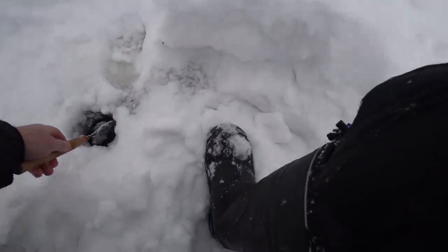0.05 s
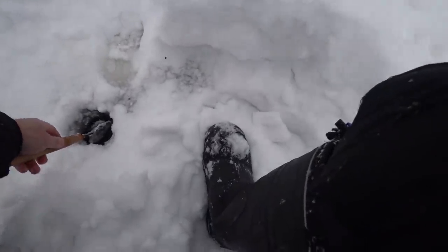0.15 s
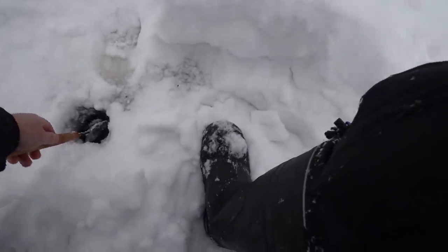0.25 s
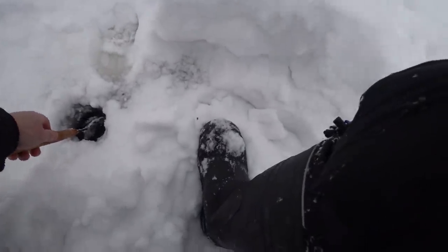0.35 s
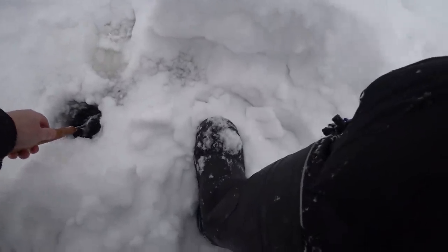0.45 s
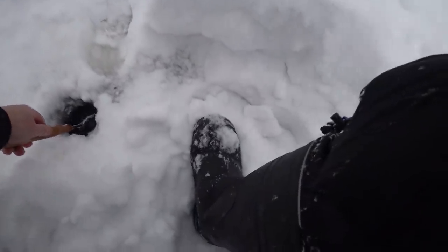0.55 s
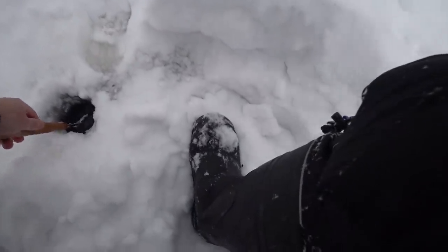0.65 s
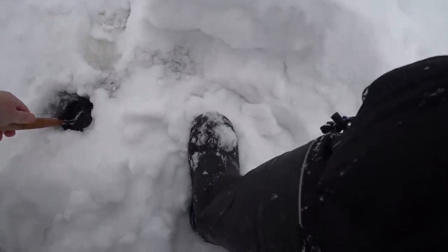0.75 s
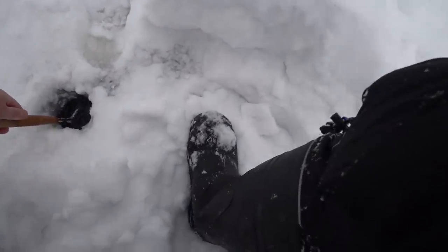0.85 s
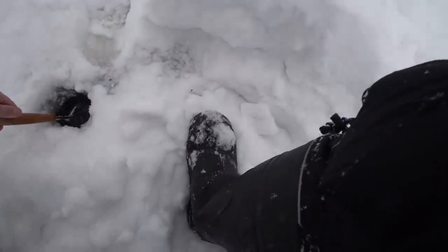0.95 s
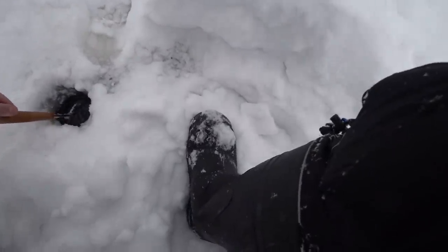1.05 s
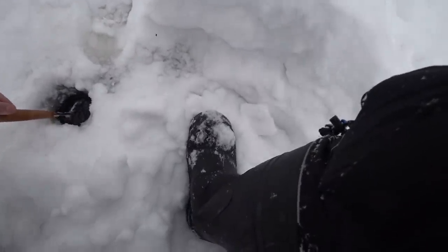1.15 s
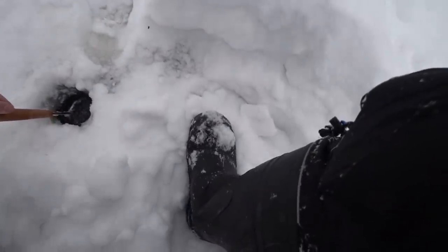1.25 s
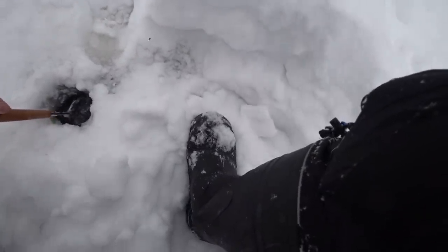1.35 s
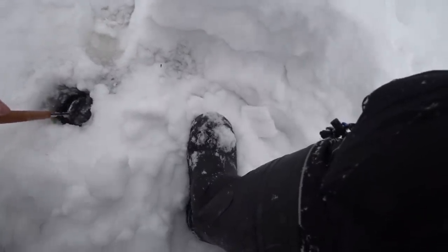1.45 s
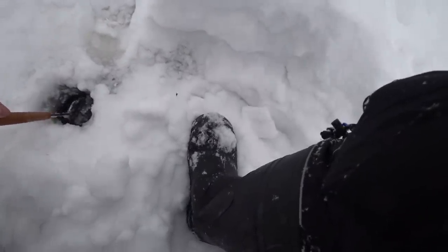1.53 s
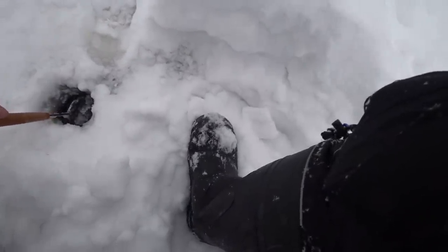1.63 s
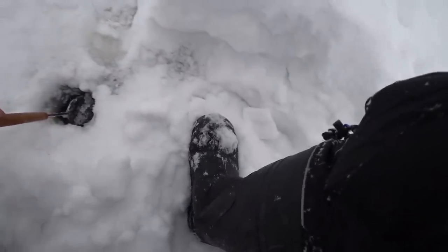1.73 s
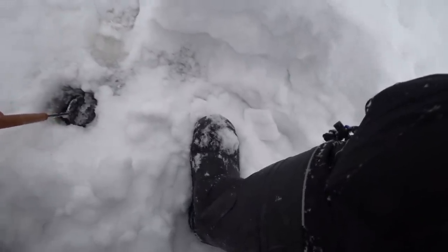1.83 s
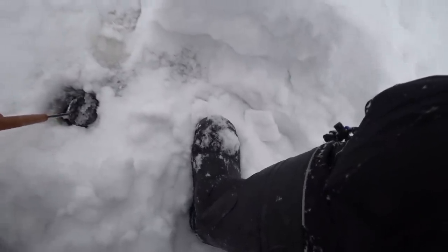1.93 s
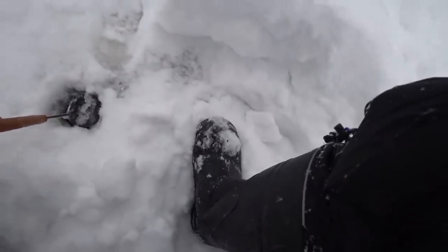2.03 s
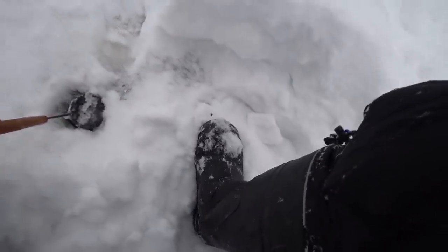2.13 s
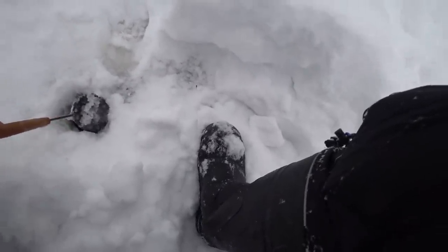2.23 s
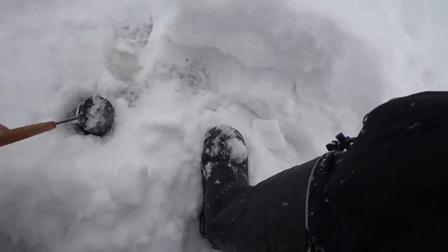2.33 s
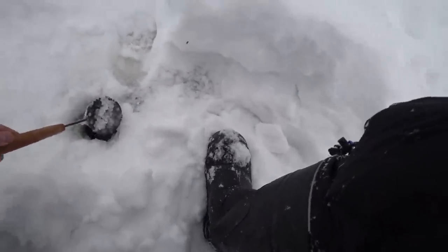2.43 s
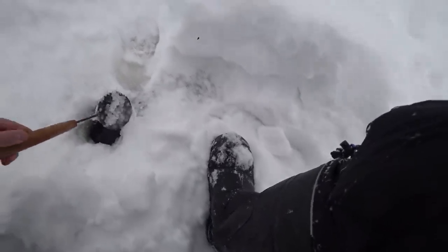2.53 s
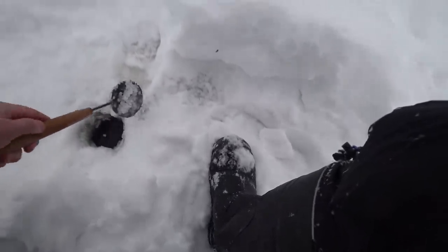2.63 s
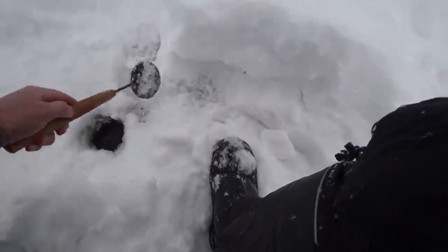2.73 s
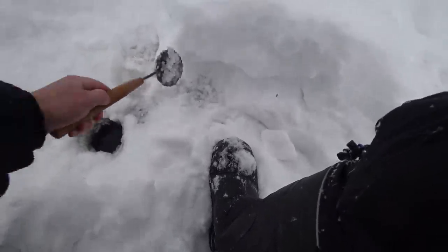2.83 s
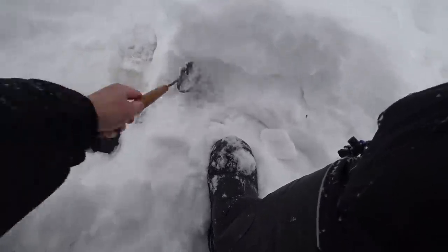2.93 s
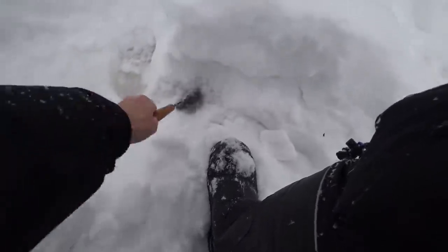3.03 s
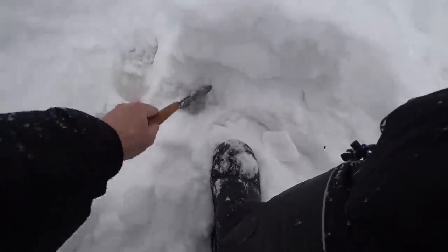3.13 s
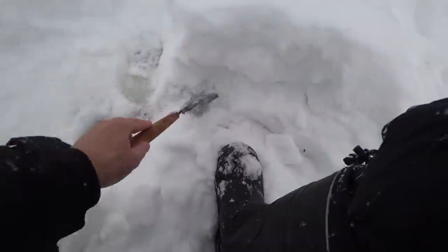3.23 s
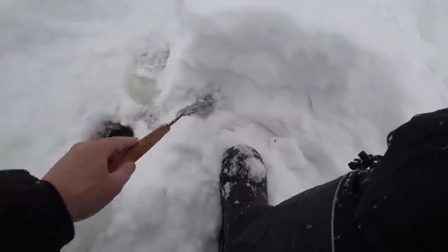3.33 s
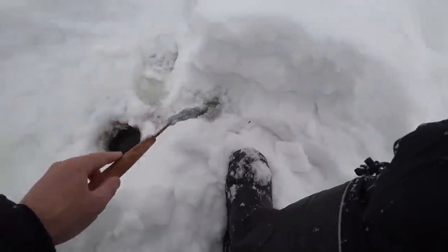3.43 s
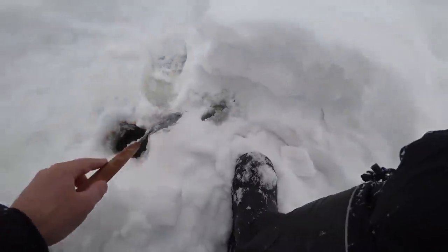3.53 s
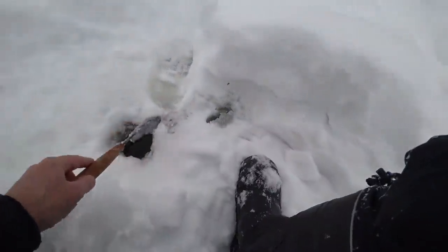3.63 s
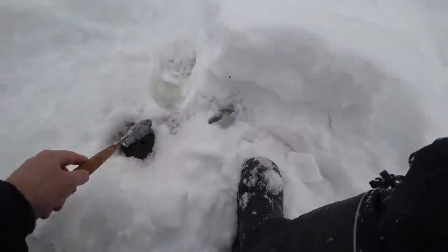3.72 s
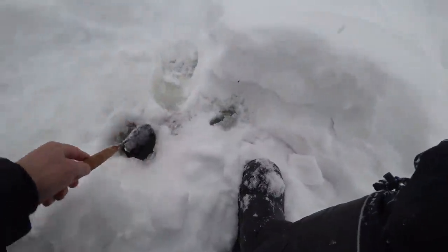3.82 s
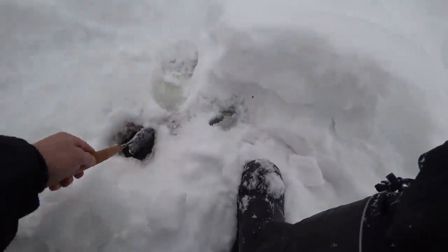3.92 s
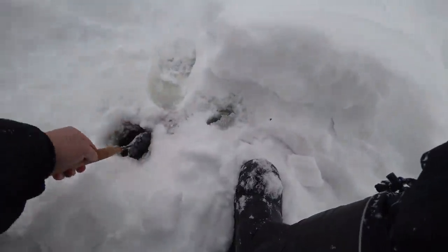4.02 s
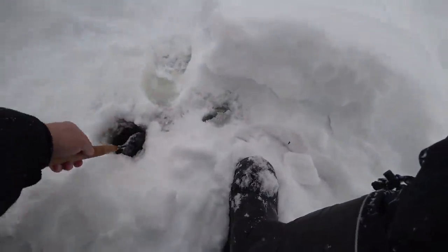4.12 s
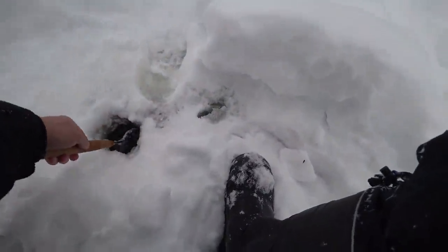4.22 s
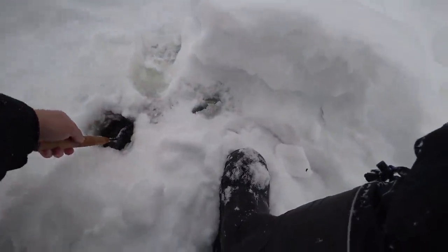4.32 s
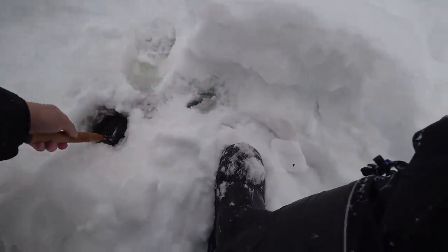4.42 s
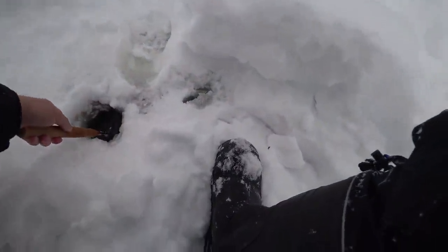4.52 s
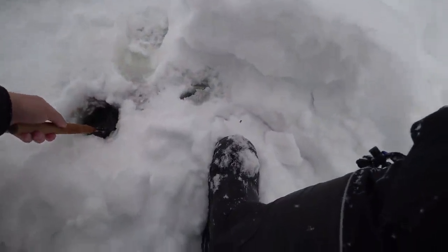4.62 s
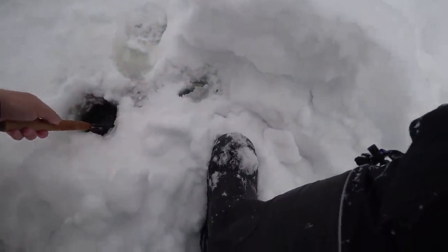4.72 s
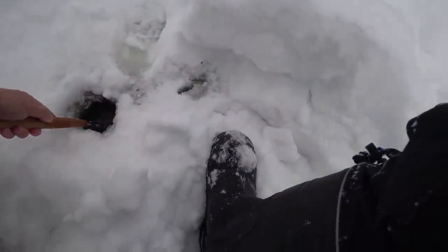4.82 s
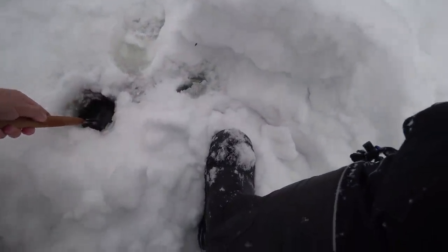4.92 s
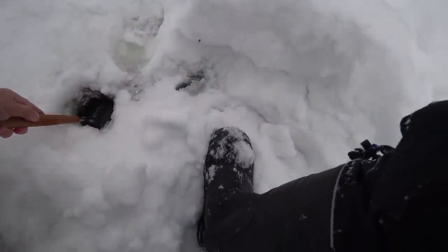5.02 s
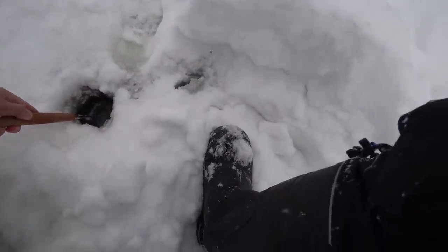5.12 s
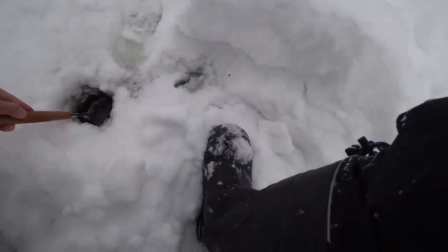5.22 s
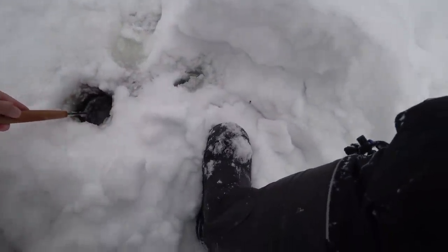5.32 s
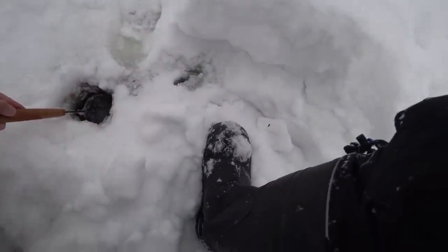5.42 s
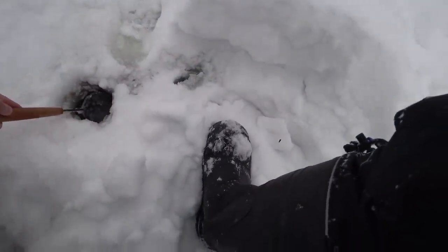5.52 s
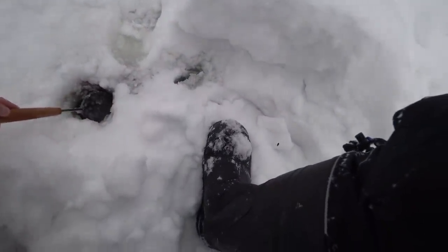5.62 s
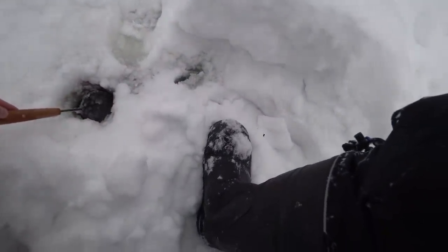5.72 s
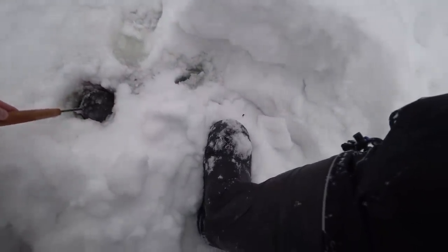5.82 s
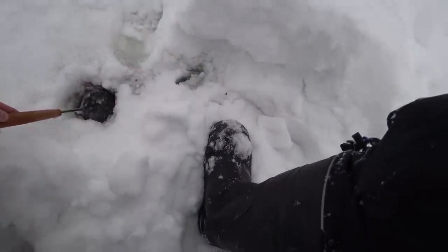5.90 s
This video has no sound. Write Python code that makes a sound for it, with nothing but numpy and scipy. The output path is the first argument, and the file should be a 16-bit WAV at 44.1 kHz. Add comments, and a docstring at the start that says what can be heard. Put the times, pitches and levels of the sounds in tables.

```python
"""Near the microphone, nylon clothes rustle over quiet, echoless air, made of filtered noise.
A steel skimmer stirs slush in an ice-fishing hole: random tiny fractures ring the hole's resonances as crunch
and slosh, ice chips and lumps tick, the rim shaves the ice, air pockets plop as damped tones, the steel knocks.
After harder pushes a jacket fold swishes on the right and a load slaps onto the snow: dense grains, a sharp crack.
The sleeve's weave zips at a gliding rib rate, the bowl cuts back through the crust, and the stirring resumes."""
import sys
import numpy as np
from scipy import signal
from scipy.fft import rfft, irfft, next_fast_len
from scipy.io import wavfile
from scipy.ndimage import uniform_filter1d, map_coordinates

SR = 44100
rng = np.random.default_rng(int(sys.argv[2]) if len(sys.argv) > 2 else 0)


def wrap_up_sound(samples):
    """Save the sound to the file named by the first command line argument, as 16-bit audio."""
    columns = np.atleast_2d(samples).T
    # keep every value between -1 and 1, then stretch to whole-number steps
    tamed = np.clip(columns, -1, 1)
    steps = np.round(tamed * 32767).astype(np.int16)
    wavfile.write(sys.argv[1], SR, steps)


N = 262836

# Resonances of the hole with the skimmer in it. Each row: centre in Hz, width in Hz, relative level in dB.
HOLE_MODES = [(730, 150, 4), (1530, 290, -3), (2087, 250, 7), (2940, 480, 3), (4400, 1520, 4),
              (6350, 120, -1.5), (7000, 130, -6), (9700, 440, -7.5)]
# Resonances of the steel bowl, damped by wet snow. Each row: centre in Hz, width in Hz, relative level in dB.
BOWL_MODES = [(3000, 310, -11), (4400, 400, -5), (6100, 1900, 28)]
# The skimmer idles in the slush. Each row: start in seconds, relative level in dB, length in seconds.
IDLE_STIRS = [(0, -65, 1.42), (4.13, -62, 1.38), (5.55, -64.5, .5)]


def amp(db):
    """Decibels to gain."""
    return 10 ** (np.asarray(db) / 20)


def unit(x):
    """Scale to rms 1."""
    return x / np.sqrt(np.mean(x ** 2) + 1e-20)


def clock():
    """The time of each sample in seconds."""
    return np.arange(N) / SR


def wobble(rate):
    """A smooth random curve with rate knots a second."""
    knots = rng.standard_normal(int(N * rate / SR) + 4)
    return map_coordinates(knots, [clock() * rate])


def filtered(x, response):
    """Multiply the spectrum of x by a complex response of frequency."""
    size = next_fast_len(N + SR // 4)
    spectrum = rfft(x, size) * response(np.fft.rfftfreq(size, 1 / SR))
    return irfft(spectrum, size)[..., :N]


def coloured(x, points):
    """Pass x through a causal filter given as (Hz, dB) points, at rms 1."""
    f, db = np.transpose(points)

    def response(hz):
        # folding the cepstrum forward in time gives the filter minimum phase
        level = np.interp(np.log(hz + 1), np.log(f + 1), db)
        cepstrum = irfft(np.log(amp(level) + 1e-6))
        half = len(cepstrum) // 2
        return np.exp(rfft(np.r_[cepstrum[0], 2 * cepstrum[1:half], np.zeros(half)]))
    return unit(filtered(x, response))


def resonated(x, modes):
    """Pass x through parallel (Hz, width in Hz, dB) resonances, at rms 1."""
    def response(f):
        return sum(amp(db) * 1j * f * w / (c * c - f * f + 1j * f * w) for c, w, db in modes)
    return unit(filtered(x, response))


def panned(x, side_db):
    """Make the left louder than the right by side_db."""
    return x * amp([[side_db / 2], [-side_db / 2]])


def noise(width):
    """Stereo white noise; width is its side over its mid."""
    mid, side = rng.standard_normal((2, N))
    return unit(np.array([mid + width * side, mid - width * side]))


def grit(rate, spread_db, width):
    """Random tiny fractures of uneven size, rate a second, at rms 1."""
    fires = rng.random(N) < rate / SR
    sizes = amp(spread_db * np.clip(rng.standard_normal(N), -2, 2))
    return unit(noise(width) * fires * sizes)


def patchy(x, depth_db):
    """Give every clump its own colour: random gain patches in time and frequency, at rms 1."""
    z = signal.stft(x, nperseg=128)[2]
    field = rng.standard_normal(z.shape[1:])
    field = uniform_filter1d(field, size=3, axis=0)  # across frequency
    field = uniform_filter1d(field, size=7, axis=1)  # across time
    return unit(signal.istft(z * amp(depth_db * unit(field)), nperseg=128)[1][:, :N])


def strokes(rows, rise):
    """The force of (start s, dB, hold s, fade t60 s) strokes; each hold includes the rise."""
    t = clock()
    power = 0
    for s, db, hold, fade in rows:
        level = amp(db - 60 * np.clip((t - s - hold) / fade, 0, 2))
        attack = np.clip((t - s) / rise, 0, 1)
        power = power + (level * attack) ** 2 * (t < s + hold + 2 * fade)
    return np.sqrt(power)


def pushes(rows):
    """The force of (start s, dB, length s) skimmer movements: a build-up, a hold, a fade."""
    rise_s, fade_t60_s = 0.028, 0.17
    return strokes([(s, db, length, fade_t60_s) for s, db, length in rows], rise=rise_s)


def add(out, s, sound):
    """Mix a short sound into out at time s."""
    part = out[..., round(s * SR):][..., :sound.shape[-1]]
    part += sound[..., :part.shape[-1]]


def crack(hz):
    """A noise crack of a few milliseconds around a pitch, trailed by quieter crumbs, at peak 1."""
    t = np.arange(SR // 20) / SR
    band = signal.butter(1, [hz * 0.47, min(hz * 1.46, SR / 3)], "band", fs=SR)
    burst, crumbs = amp(-60 * t / .008), amp(-15 - 60 * t / .03)
    force = (burst + crumbs) * (1 - np.exp(-t / .0009))
    snap = signal.lfilter(*band, rng.standard_normal(len(t)) * force)
    return snap / np.abs(snap).max()


def ring(hz, t60):
    """A short damped tone that starts at hz and rises slightly, at peak 1."""
    t = np.arange(SR // 10) / SR
    cycles = hz * t * (1 + 0.04 * t / t60)
    tone = np.sin(2 * np.pi * cycles) * amp(-60 * t / t60) * (1 - np.exp(-t / 0.0009))
    return tone / np.abs(tone).max()


def air():
    """The still air: a slowly wavering low rumble, nearly alike on both sides, and faint wide hiss."""
    # Colour of the rumble. Each row: frequency in Hz, relative level in dB per Hz.
    rumble_colour = [(10, -2), (25, -6), (55, -5.5), (110, -14.5), (250, -24), (600, -40)]
    # Colour of the hiss. Each row: frequency in Hz, relative level in dB per Hz.
    hiss_colour = [(60, -12.5), (250, 4.5), (600, -16.5), (1200, -9.5), (2500, -6.5), (5000, -6.5),
                   (9000, -8), (11000, -10.5)]
    rumble = coloured(noise(width=.1), rumble_colour) * amp(wobble(5))
    hiss = coloured(noise(width=.7), hiss_colour)
    wide = resonated(noise(width=3.4), [(640, 870, 0)])
    return amp(-64.5) * rumble + amp(-64.5) * hiss + amp(-62.5) * wide


def sleeve():
    """Rubbing threads hiss, padding rustles, and the ribbed weave zips at a pitch set by the slide's speed."""
    # The arm reaches in, lifts, swings out and back, settles.
    # Each row: start in seconds, hiss level in dB, hold in seconds, fade t60 in seconds.
    arm_moves = [(-.3, -62, 0.63, 2.7), (.3, -57, 0.44, 4.4), (1.8, -57.5, 0.77, 2.2),
                 (2.72, -50, 0.79, 6.9), (4.55, -61.5, 0.62, 0.67)]
    # Ribs of the weave slide over each other. Each row: fastest moment in seconds,
    # time from it to 1/e of the speed in seconds, top ribs per second in Hz, relative level in dB.
    rib_slides = [(3.5, 0.0435, 430.5, -46), (3.949, .135, 932, -56.5)]
    # Colour of the nylon. Each row: frequency in Hz, relative level in dB per Hz.
    nylon_colour = [(710, 6), (1200, 5), (2040, 2), (2300, 3.5), (2690, 0), (3620, 4), (7590, 0),
                    (11000, -6.5), (14300, -64), (22000, -120)]
    # Colour of the padding. Each row: frequency in Hz, relative level in dB per Hz.
    padding_colour = [(30, -2), (120, -0.5), (340, 4), (600, -2), (1100, -10), (2000, -18), (5000, -51)]
    slow_rib_hz = 374.4  # mean rib rate as a slide starts and ends

    hiss = strokes(arm_moves, rise=0.24)
    # the padding's rustle saturates at -59.5 dB as the hiss passes -57 dB
    rustle = amp(-59.5) * np.tanh(hiss / amp(-57))
    threads = grit(rate=9000, spread_db=2.5, width=.65)
    cloth = hiss * coloured(threads, nylon_colour) + rustle * coloured(noise(width=0.07), padding_colour)

    # each slide speeds up and slows down; rib rate and power follow its speed
    rib_hz, slide = slow_rib_hz, 0
    for s, half, top_hz, db in rib_slides:
        speed = np.exp(-((clock() - s) / half) ** 2)
        rib_hz = rib_hz + speed * (top_hz - slow_rib_hz)
        slide = slide + amp(db) * np.sqrt(speed)
    unevenness = 1 + .1 * wobble(300)
    phase = 2 * np.pi * np.cumsum(rib_hz * unevenness) / SR
    ribs = (np.sin(phase) + amp(-9) * np.sin(2 * phase)) * amp(1.2 * wobble(90))
    # each passing rib lets out a puff of friction noise
    friction = resonated(noise(width=0.31), [(930, 210, 5), (2220, 480, 2.0), (3900, 430, 3), (5560, 630, -15)])
    rasp = friction * (1 + np.cos(phase))
    return panned(cloth + slide * (ribs + amp(-1.5) * rasp), side_db=1.3)


def stirring():
    """Crystals break in clumps and ring the hole; water sloshes in its lowest resonance, more under a push."""
    # The skimmer is pushed through the slush.
    # Each row: start in seconds, relative level in dB, length in seconds.
    hard_pushes = [(1.03, -61.5, 0.15), (1.26, -60.5, 0.1), (1.65, -50.5, 0.67), (1.685, -45, 0.069),
                   (2.02, -46, 0.21), (2.1, -46, 0.09), (4.82, -65, 0.11), (5.44, -60, 0.026)]
    idle = pushes(IDLE_STIRS) * amp(2.0 * wobble(13))
    push = pushes(hard_pushes)
    crystal = np.hypot(idle, push)
    # slosh grows 0.56 dB for each dB of push
    effort = push / amp(-45)
    slosh = np.hypot(amp(-6.5) * idle, amp(-51) * effort ** 0.56)

    clumps = amp(1.5 * wobble(45) + 1.2 * wobble(160))
    fine = grit(rate=4000, spread_db=3, width=.6)
    # a slow stir breaks single lumps; in a fast one they merge into the fine crunch
    single = 1 / (1 + crystal / amp(-54))
    coarse = single * grit(rate=90, spread_db=2, width=.4)
    crackle = patchy(resonated((fine + amp(-3) * coarse) * clumps, HOLE_MODES[1:]), depth_db=3.3)

    # the narrow shaft passes only a hollow band of the sloshing
    surge = grit(rate=2000, spread_db=2, width=.3)
    hollow = resonated(resonated(surge, [(690, 250, 0)]), [(660, 250, 0)])
    # lumps of slush bob and knock softly on the bowl
    bobbing = resonated(single * grit(rate=70, spread_db=2, width=.3), [(440, 170, 0)])
    water = slosh * amp(-3) * (hollow + bobbing)
    return panned(amp(1.5) * crystal * crackle + water, side_db=2)


def lumps():
    """Loose lumps of ice tick on the idling bowl, and the whole hole rings with each."""
    t = np.arange(SR // 100) / SR
    fires = rng.random(N) < 24 / SR  # 24 ticks a second on average
    hits = fires * amp(4 * np.clip(rng.standard_normal(N), -1.5, 1.5))
    force = signal.fftconvolve(hits, amp(-60 * t / .012))[:N]
    ticks = resonated(force * noise(width=.3), HOLE_MODES)
    return panned(amp(-7) * pushes(IDLE_STIRS) * ticks, side_db=-3)


def chips_and_slap_crack():
    """Ice chips snap on the steel and the load's slap cracks on the snow, each a short noise crack."""
    # Single ice chips snap against the steel; the loudest row, at 3.0574 s, is instead the sharp crack
    # of the load's slap on the snow. Each row: time in seconds, relative peak level in dB, left over right in dB.
    snaps = [(0.0672, -40, 7), (0.3222, -33, -5), (0.3515, -34.5, -11), (1.3004, -40, -8), (1.932, -37, -8),
             (2.0708, -27, 4), (2.3062, -31.5, -8), (2.9941, -28, 3), (3.0574, -9.5, 1), (3.1635, -30.5, 6),
             (4.9465, -37.5, -0.5), (5.239, -31, 1.5), (5.298, -40, -9), (5.3515, -35.5, 9),
             (5.89, -31.5, -7)]
    median_hz, log_spread = 4530, .14  # each crack has a slightly different pitch
    out = np.zeros((2, N))
    for s, db, side_db in snaps:
        hz = median_hz * np.exp(log_spread * rng.standard_normal())
        add(out, s, panned(amp(db - 4.5) * crack(hz), side_db))
    return out


def shaving():
    """The rim catches the ice wall in short, coarse crunches: dense fractures that ring the hole."""
    # Each row: start in seconds, level in dB, hold in seconds.
    wall_shaves = [(0.257, -49, 0.015), (0.67, -54.5, 0.015), (1.177, -54.5, 0.013), (1.378, -49, 0.018),
                   (1.803, -49.5, 0.017), (1.863, -42, 0.019), (1.959, -46.5, 0.015), (2.006, -49, 0.012),
                   (2.23, -47, 0.055), (4.136, -40.5, .01), (4.313, -55.5, 0.039), (4.467, -46.5, 0.0064),
                   (5.05, -53, 0.017)]
    crunch = patchy(resonated(grit(rate=5000, spread_db=2, width=.35), HOLE_MODES), depth_db=2.5)
    # a shave's fade t60 is 2.8 times its hold
    force = strokes([(s, db, hold, 2.8 * hold) for s, db, hold in wall_shaves], rise=0.00036)
    return panned(crunch * force, side_db=2.5)


def plops():
    """Air pockets, drips and soft bumps ring once, each as a damped tone at its own pitch."""
    # Each row: time in seconds, peak level before panning in dB, starting pitch in Hz.
    pocket_rings = [(.351, -46, 560), (0.914, -43.5, 550), (1.175, -43, 578), (2.203, -37.5, 4100),
                    (2.234, -42, 3640), (3.061, -31.5, 178), (3.336, -40, 760), (3.64, -36.5, 207),
                    (4.874, -42.5, 670), (5.094, -42, 663), (5.444, -43.5, 168)]
    out = np.zeros(N)
    for s, db, hz in pocket_rings:
        add(out, s, amp(db) * ring(hz, t60=0.022))
    return panned(out, side_db=0.5)


def knocks():
    """Steel meets ice with a dull crack and the hole rings; a harder knock is mostly more ring."""
    # The skimmer knocks on the wall of the hole. Each row: time in seconds, relative level in dB.
    wall_knocks = [(1.38, -39.5), (3.636, -34.5), (4.359, -45), (4.678, -51), (4.825, -27.5),
                   (5.128, -43.5), (5.237, -37)]
    # What a knock rings with. Each row: starting pitch in Hz, relative level in dB, t60 in seconds.
    knock_modes = [(594, -0.5, 0.013), (2010, -13, 0.015)]
    contact, body = np.zeros((2, N))
    for s, db in wall_knocks:
        # the contact grows only 0.32 dB for each dB of knock
        force = amp(db + 40)
        add(contact, s, amp(-36.5) * force ** 0.32 * crack(hz=2070))
        add(body, s, sum(amp(db + level) * ring(hz, t60) for hz, level, t60 in knock_modes))
    return panned(contact, side_db=5) + panned(body, side_db=2.0)


def jacket():
    """Nylon slides on nylon as the body leans: dense fine grit makes a smooth swish on the right."""
    # Colour of the sliding fold. Each row: frequency in Hz, relative level in dB per Hz.
    fold_colour = [(59, -38), (100, -18), (437, -6.5), (473, -10), (804, 1), (1480, -3), (2470, -1.5),
                   (3120, -6), (7870, -6.5), (11000, -15.5), (14300, -53), (22000, -120)]
    # start in seconds, relative level in dB, hold and fade t60 in seconds
    level = strokes([(2.286, -44.5, 0.3, 0.25)], rise=0.15)
    swish = coloured(grit(rate=20000, spread_db=1.0, width=0.58), fold_colour)
    return panned(amp(1.5) * level * swish, side_db=-8.0)


def dumping():
    """Wet slush bursts against the bowl as dense grains, and the snow thuds beneath it as low noise."""
    # The load hits the snow, then spatters.
    # Each row: start in seconds, relative level in dB, hold in seconds, fade t60 in seconds.
    snow_slaps = [(3.027, -23, 0.0071, 0.036), (3.034, -21, 0.028, 0.073), (3.092, -39, 0.019, 0.38),
                  (3.106, -34, 0.012, 0.067)]
    # Colour of the wet burst. Each row: frequency in Hz, relative level in dB.
    splat_colour = [(60, -45), (250, -16), (540, -10), (760, -18), (1320, -10), (2000, -6), (2500, -11),
                    (4480, -1), (5900, -2), (6600, -6), (11000, -8)]
    grains = patchy(grit(rate=22000, spread_db=1.5, width=.24), depth_db=1.8)
    burst = coloured(grains, splat_colour) + amp(-10.5) * resonated(grains, BOWL_MODES)
    splat = burst * strokes(snow_slaps, rise=0.0021)
    low = coloured(noise(width=.8), [(50, -14), (150, 0), (270, -1), (800, -26)])
    thud = low * strokes([(3.047, -45, .025, .25)], rise=.01)
    return panned(amp(-2.5) * splat, side_db=1) + thud


def cutting():
    """The bowl goes back in through the slush crust: lumpy grains crunch brightly and ring the steel."""
    # Each row: start in seconds, relative level in dB, hold in seconds, fade t60 in seconds.
    crust_cuts = [(3.958, -36.5, 0.0081, 0.086), (3.977, -36.5, 0.033, 0.24), (4.02, -41, 0.057, 0.079)]
    # Colour of the breaking crust. Each row: frequency in Hz, relative level in dB per Hz.
    crust_colour = [(180, -31), (300, -21), (524, -20), (667, -3), (915, -7.5), (1720, 4.5), (2260, -2),
                    (2750, 8), (3550, 3.5), (4450, 6.5), (8640, 3), (10200, 4.5), (11000, 1.5),
                    (14300, -50), (22000, -120)]
    grains = patchy(grit(rate=12000, spread_db=3, width=.3) * amp(wobble(150)), depth_db=2.5)
    crunch = coloured(grains, crust_colour) + amp(-10) * resonated(grains, BOWL_MODES)
    return panned(amp(2.0) * crunch * strokes(crust_cuts, rise=0.0028), side_db=3.0)


def scene():
    """Everything is near and dry: the sources add up without any echo."""
    surroundings = air() + sleeve() + jacket()
    slush = stirring() + lumps() + plops()
    blows = chips_and_slap_crack() + shaving() + knocks() + dumping() + cutting()
    return surroundings + slush + blows


def record(dry):
    """The microphone's band limit: the treble fades to nothing over 200 Hz around 11130 Hz."""
    top_hz = 11130
    return filtered(dry, lambda hz: np.clip((top_hz - hz) / 200 + .5, 0, 1))


dry = scene()
out = record(dry)
wrap_up_sound(out)
```